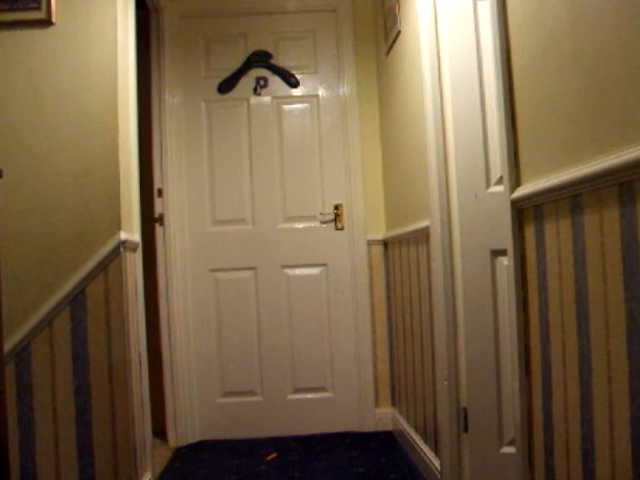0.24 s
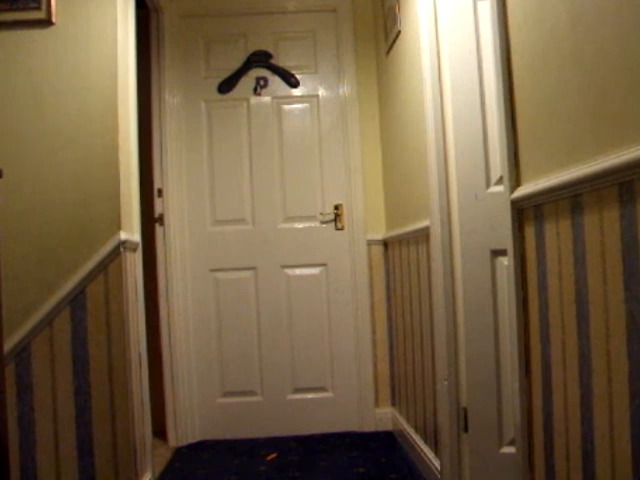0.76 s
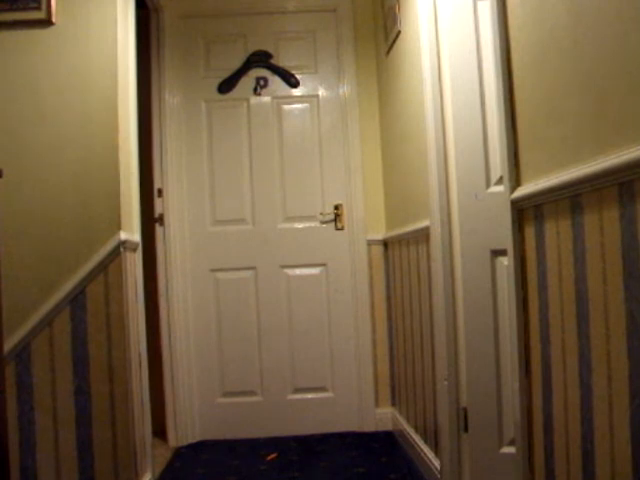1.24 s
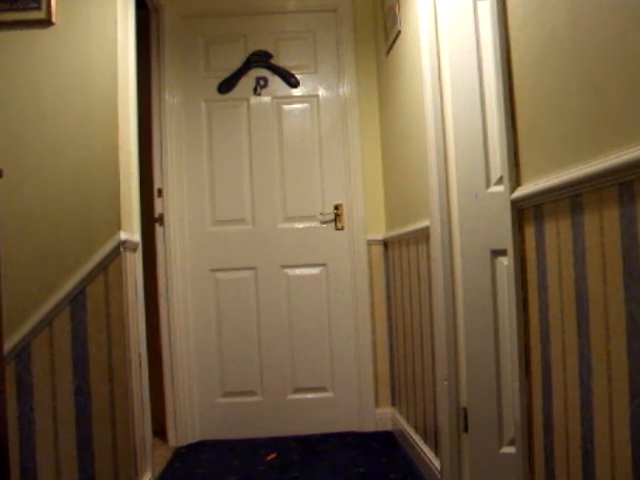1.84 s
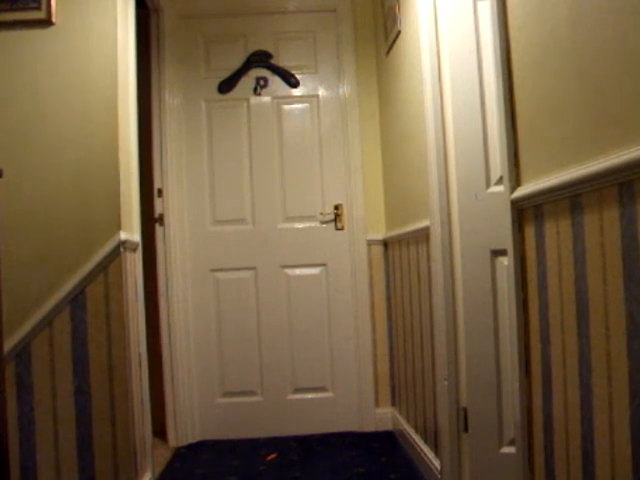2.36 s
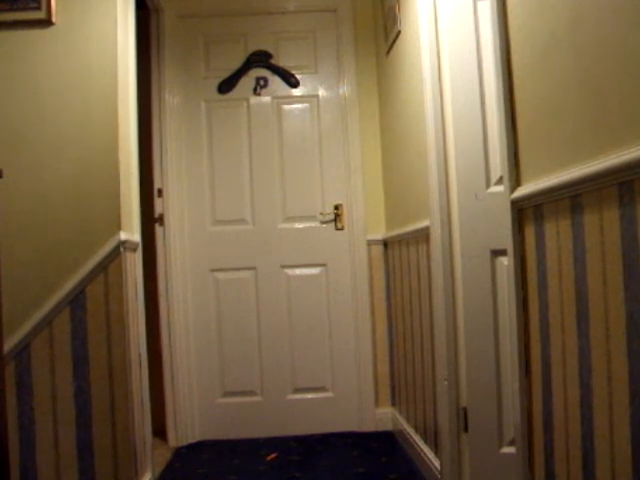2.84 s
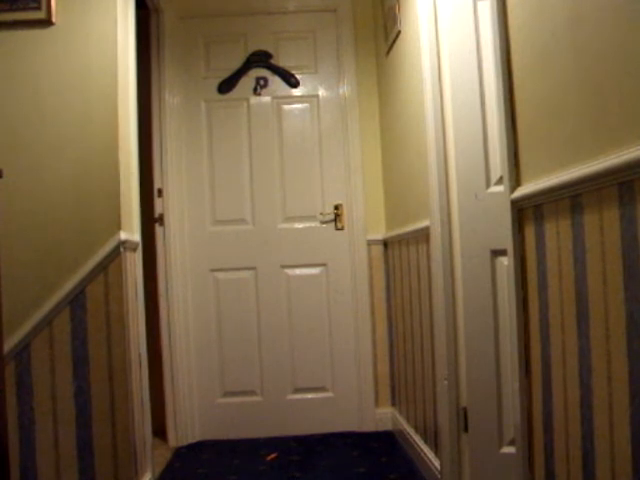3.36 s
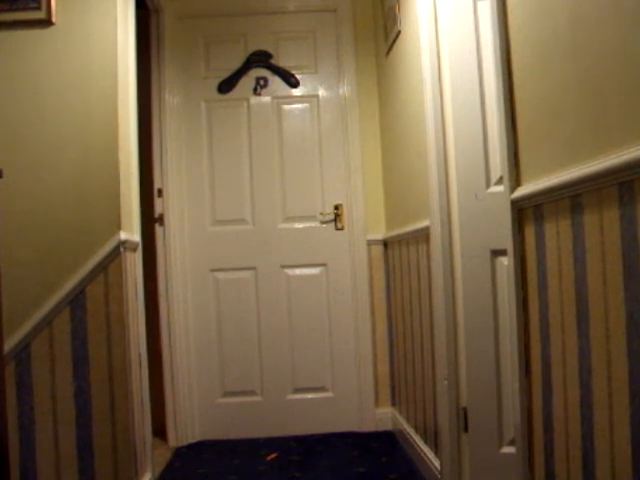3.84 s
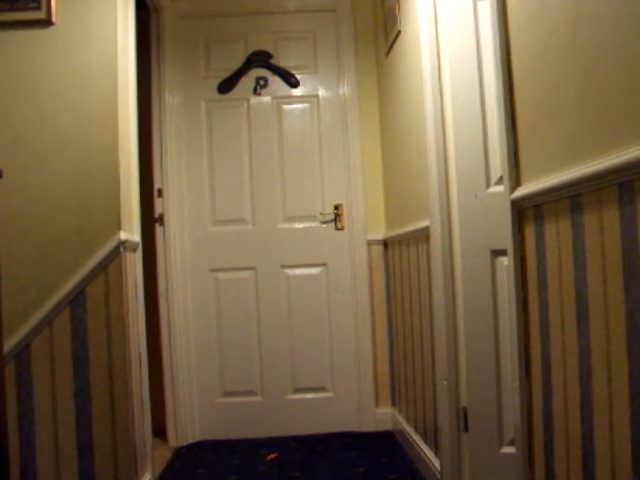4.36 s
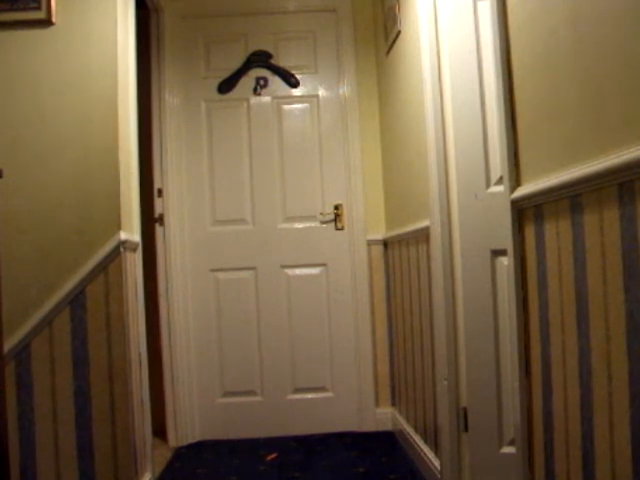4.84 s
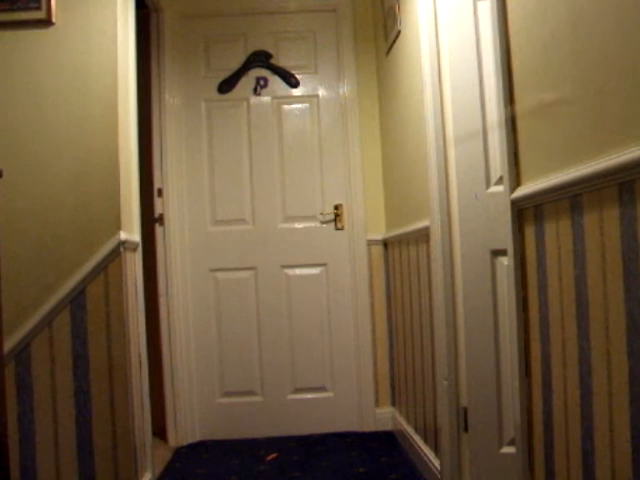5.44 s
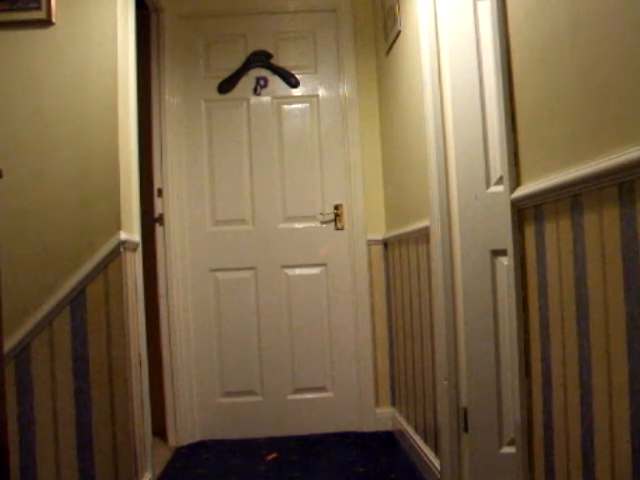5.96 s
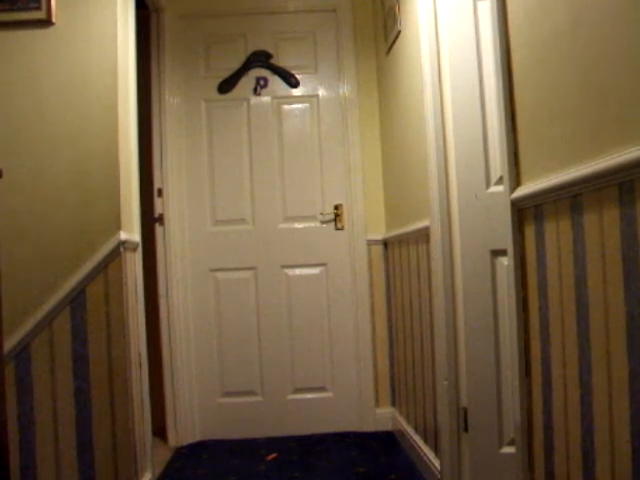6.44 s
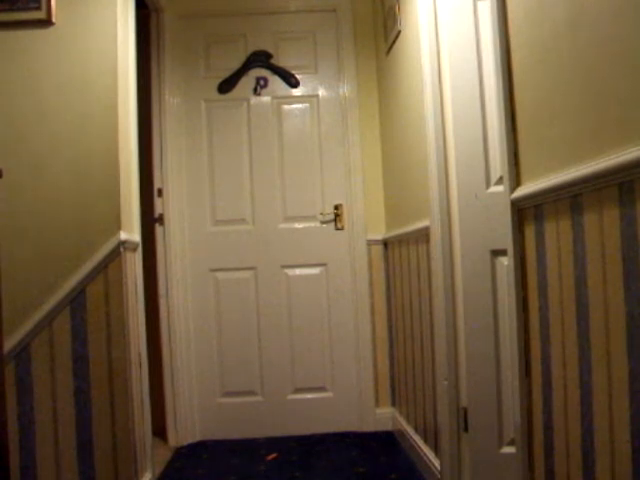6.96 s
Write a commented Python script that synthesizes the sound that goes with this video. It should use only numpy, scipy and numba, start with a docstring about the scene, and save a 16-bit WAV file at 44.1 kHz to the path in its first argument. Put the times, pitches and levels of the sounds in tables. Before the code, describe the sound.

In a narrow hallway, a toy foam-dart blaster fires close to the microphone with a plastic snap and a pop of air, and the dart knocks on a wooden door farther off. The slide is pumped twice with short rasps and clacks. A louder second shot hits the door, then one more pump leads to a third shot. Faint handling knocks and a steady hiss lie underneath.

```python
"""A spring-powered foam-dart blaster is fired close by in a narrow hallway, over a steady hiss.
Loose parts knock in the hand; then a catch clicks, the plunger slams home with a pop of air, and
the dart sets a far wooden door ringing. The slide is pumped twice, rasping by stick-slip friction
and clacking on its stops. A second shot hits the door; one more pump and a third shot follow.
Throughout, gain control ducks on each bang and lets the reverberation swell back."""
import sys
import numpy as np
from scipy import signal
from scipy.fft import rfft, irfft
from scipy.io import wavfile
from numba import njit

SR = 44100
rng = np.random.default_rng(int(sys.argv[2]) if len(sys.argv) > 2 else 0)


def persist_wave(psi):
    """Save psi, clipped to +-1, as 16-bit WAV."""
    counts = np.round(np.clip(psi, -1, 1) * 32767).astype(np.int16)
    wavfile.write(sys.argv[1], SR, np.atleast_2d(counts).T)


N = 317079
TIME = np.arange(N) / SR
BAND_HZ = 7800  # upper edge of the sound
BRIGHT_RASP_DB_PER_OCTAVE, DULL_RASP_DB_PER_OCTAVE = -2.1, -4.5

# The plunger reaches the end of its tube: time_s, slam_db, pop_db, pop_pitch_hz, thump_db
FIRINGS = [(1.339, 9.5, 8, 395, -15), (5.4919, 18, 19.5, 388, 16.5), (7.0646, 21.5, 21, 406, 9)]
# Spectrum of the hand-damped plastic shell, struck hard: frequency_hz, level_db
SHELL_SPECTRUM = [(40, -46), (150, -25.5), (300, -17.5), (450, -5), (600, -1), (900, -6.5), (1200, 2.5),
                  (1500, -3), (1735, 3.5), (2000, -1), (2800, -1), (4500, -2.5), (6300, -2.5), (7600, -2.5)]


def amp(db):
    """Amplitude ratio of a level in decibels."""
    return 10 ** (np.asarray(db) / 20)


def unit(x):
    """Normalisation to unit energy."""
    return x / np.sqrt(np.sum(x ** 2))


def add(track, start_s, x):
    """Superposition: x joins the track at start_s."""
    i = int(start_s * SR)
    track[i:i + len(x)] += x[:max(N - i, 0)]


def through(x, response):
    """Convolution with an impulse response, cut to the length of x."""
    return signal.fftconvolve(x, response)[:len(x)]


def colour(x, spectrum, tilt=0, size=4096):
    """Minimum-phase filter of unit energy; tilt is in dB per octave above 300 Hz."""
    hz, db = np.transpose(spectrum)
    bin_hz = np.maximum(np.arange(size // 2 + 1) * SR / size, 1)
    db = np.interp(np.log(bin_hz), np.log(hz), db) + tilt * np.log2(np.maximum(bin_hz, 300))
    db -= np.clip((bin_hz - BAND_HZ) / 30, 0, 60)
    # folding the cepstrum makes the filter causal
    cepstrum = irfft(np.log(amp(db)))
    cepstrum[1:size // 2] *= 2
    cepstrum[size // 2 + 1:] = 0
    response = irfft(np.exp(rfft(cepstrum)))
    return signal.fftconvolve(x, unit(response))


def fade(t60_s, length_s):
    """Damping: an exponential decay of 60 dB in t60_s."""
    return 1000 ** (-TIME[:int(length_s * SR)] / t60_s)


def ring(modes, length_s):
    """Free vibration is a sum of damped modes; neighbours swing in opposite directions."""
    t = TIME[:int(length_s * SR)]
    return sum((-1) ** k * amp(db) * fade(t60_s, length_s) * np.sin(2 * np.pi * hz * t)
               for k, (hz, db, t60_s) in enumerate(modes))


def crack(t60_s, spectrum, tilt=0, rise_s=0.00034):
    """Impact noise: hard parts chatter briefly, and softer contacts rise more slowly."""
    envelope = fade(t60_s, 0.1)
    envelope *= 1 - np.exp(-TIME[:len(envelope)] / rise_s)
    burst = colour(envelope * rng.standard_normal(len(envelope)), spectrum, tilt)
    return unit(burst) * np.sqrt(np.sum(envelope ** 2))


def body(hz, bass_db):
    """Broad resonance of a hollow body around hz: rows of frequency_hz, level_db."""
    return [(40, bass_db - 12), (hz / 2, bass_db), (hz, 0), (2 * hz, -14), (7000, -40)]


def thud(hz, t60_s, bass_db):
    """An impact excites a broad resonance and sounds as a dull knock."""
    return crack(t60_s, body(hz, bass_db), rise_s=0.00024)


def scrape(length_s, spectrum, tilt, swell_db, slips_per_s=1400, scatter_db=4, rub=0.33):
    """Stick-slip friction: random slips roughen a steady rub that changes by swell_db on the way."""
    n = int(length_s * SR)
    slips = (rng.random(n) < slips_per_s / SR) * amp(scatter_db * rng.standard_normal(n))
    roughness = rub + through(slips, fade(0.019, 0.02))
    rasp = roughness * rng.standard_normal(n) * amp(np.linspace(0, swell_db, n))
    return np.sqrt(n) * colour(unit(rasp), spectrum, tilt)


def hiss(level_db=-49.5):
    """Stationary coloured noise lies under the scene."""
    # Spectrum of the hiss: frequency_hz, level_db
    hiss_spectrum = [(25, -11.5), (60, -11), (125, -12), (170, -12), (240, -4.5), (310, -14.5),
                     (400, -10.5), (610, -7.5), (1000, -14), (1700, -13), (3000, -15.5), (5000, -17),
                     (7800, -14.5)]
    return amp(level_db) * colour(rng.standard_normal(N), hiss_spectrum)[:N]


def grip_shifts(per_s=4.1, level_db=-40.5, spread_db=1.5, tilt=-1):
    """Timing jitter: the grip shifts once at random in each time slot, giving rows for handling()."""
    slots = rng.random((int(per_s * N / SR), 2))
    return [((k + when) / per_s, level_db + spread_db * (2 * size - 1), tilt)
            for k, (when, size) in enumerate(slots)]


def handling(shifts, t60_s=0.035, rise_s=0.0015, rebound_s=0.036):
    """Inelastic collision: each loose part knocks, then drops back once, more softly."""
    # The trigger and loose parts knock in the hand: time_s, level_db, tilt_db_per_octave
    knocks = [(0.061, -32.5, 0.5), (0.333, -38, 3), (0.858, -39, -1.5), (1.099, -35, 5.5),
              (1.175, -35, -2.5), (1.272, -20.5, 4), (2.232, -29.5, 0), (2.408, -30, 0), (2.498, -32.5, -2),
              (2.764, -27.5, -3), (3.117, -25, 5), (3.130, -29, 0.5), (3.346, -25.5, 2), (3.787, -29, -0.5),
              (3.869, -27.5, 4), (4.439, -39, 1), (4.598, -38.5, -1.5), (5.086, -40, 3),
              (5.188, -31.5, -0.5), (5.435, -27, 0.5), (6.009, -27, 0)]
    # Spectrum of the shell, struck softly: frequency_hz, level_db
    soft_spectrum = [(60, -25), (250, -17.5), (450, 4.5), (650, 0), (1300, -1.5), (1800, -4.5), (3000, -10),
                     (7800, -27.5)]
    out = np.zeros(N)
    for time_s, db, tilt in list(knocks) + shifts:
        add(out, time_s, amp(db + 1) * crack(t60_s, soft_spectrum, tilt, rise_s))
        add(out, time_s + rebound_s, amp(db - 10) * crack(t60_s, soft_spectrum, 0, rise_s))
    return out


def hallway(early_db=8, early_s=0.01, build_s=0.005):
    """Reverberation: close walls answer almost at once, then each band decays at its own rate."""
    # Diffuse tail of the hallway: frequency_hz, t60_s, level_db
    bands = [(100, 0.26, 19.5), (430, 0.36, 7), (975, 0.33, 5), (2740, 0.34, 4.5), (7500, 0.28, 6.5)]
    hz, t60_s, db = np.transpose(bands)
    t, tail = TIME[:SR], np.zeros(SR)
    noise = rfft(rng.standard_normal(SR))
    band_position = np.interp(np.log(np.arange(len(noise)) + 1), np.log(hz), np.arange(len(hz)))
    for k in range(len(hz)):
        weight = np.maximum(1 - abs(band_position - k), 0)
        tail += amp(db[k]) * fade(t60_s[k], 1) * irfft(noise * weight, SR)
    build_up = (1 - np.exp(-t / build_s)) ** 2
    early_boost = 1 + amp(early_db) * np.exp(-t / early_s)
    return unit(tail * build_up * early_boost)


def end_stop(clack_db, thump_db, thump_hz):
    """Impact of the slide on its stop: the shell clacks and the hollow body resonates."""
    clack = amp(clack_db) * crack(0.021, SHELL_SPECTRUM, tilt=-1.5, rise_s=0.0014)
    return clack + amp(thump_db) * thud(thump_hz, t60_s=0.028, bass_db=-26)


def slide_taps():
    """Mechanical play lets the loose slide tap its stop."""
    # Taps outside the strokes: time_s, clack_db, thump_db, thump_hz
    taps = [(0.376, -29, -28.5, 1400), (2.120, -15, -18.5, 646), (6.661, -36, -34, 1720)]
    out = np.zeros(N)
    for time_s, clack_db, thump_db, thump_hz in taps:
        add(out, time_s, end_stop(clack_db, thump_db, thump_hz))
    return out


def plunger(rush_s=0.012, slam_lag_s=0.000988):
    """Elastic energy is released: the catch slips, the plunger rushes down its tube and slams home."""
    # The trigger catch lets go: time_s, level_db, tilt_db_per_octave, t60_s
    catches = [(1.3303, 2, -2, 0.051), (5.4815, -3.5, 4.5, 0.022), (7.0548, -1, 2, 0.019)]
    out = np.zeros(N)
    for time_s, db, tilt, t60_s in catches:
        add(out, time_s, amp(db) * crack(t60_s, SHELL_SPECTRUM, tilt, rise_s=0.0012))
    for time_s, slam_db, _, _, thump_db in FIRINGS:
        add(out, time_s - rush_s, amp(-25) * scrape(rush_s, SHELL_SPECTRUM, tilt=-7, swell_db=6))
        add(out, time_s + slam_lag_s, amp(slam_db) * crack(0.052, SHELL_SPECTRUM, rise_s=0.00042))
        add(out, time_s, amp(thump_db) * thud(hz=1100, t60_s=0.013, bass_db=-30.5))
    return out


def air_pops(rise_s=0.0013, barrel_db=-9, barrel_t60_s=0.031):
    """Air-column resonance: a pulse of air leaves behind the dart, and the open barrel rings on."""
    out, t = np.zeros(N), TIME[:SR // 10]
    pulse = (t / (2 * rise_s)) ** 2 * np.exp(2 - t / rise_s)
    barrel = amp(barrel_db - 60 * t / barrel_t60_s) * (1 - np.exp(-t / rise_s))
    for time_s, _, pop_db, pitch_hz, _ in FIRINGS:
        add(out, time_s, amp(pop_db) * (pulse + barrel) * np.cos(2 * np.pi * pitch_hz * t))
    return out


def spring(pitch_hz=436):
    """The steel spring rings at a natural frequency: briefly when slack, for long when cocked."""
    # The spring is set ringing: start_s, level_db, t60_s
    excitations = [(1.34, -16, 0.39), (5.495, -7, 0.4), (6.355, -33, 1.62), (7.066, -15, .35)]
    out = np.zeros(N)
    for start_s, db, t60_s in excitations:
        add(out, start_s, ring([(pitch_hz, db, t60_s)], length_s=2))
    return out


def darts():
    """Modal excitation: where a rubber tip slaps the door decides which panel modes answer."""
    # Darts land and the door shudders: time_s, level_db, slap_db, centre_hz, half_width_octaves
    impacts = [(1.592, -20.5, -9, 380, 0.48), (1.614, -11.5, -43, 703, 0.052),
               (1.944, -39.5, -86, 181, 0.71), (5.702, -3.5, -6, 910, 0.71),
               (5.720, -2.5, -38.5, 760, 0.083), (5.871, -22, -26, 561, 0.12)]
    # Modes of the wooden door panels: frequency_hz, level_db, t60_s
    door_modes = [(85, 0, .18), (170, 0, .18), (242, 2, .2), (330, -2, .14), (479, -5, .17), (517, -6, .15),
                  (630, 1, .18), (684, -1, .17), (781, -1, .18), (840, -2, .22), (930, -5, .13),
                  (1150, -8, .15)]
    panels, slaps = np.zeros(N), np.zeros(N)
    for time_s, db, slap_db, centre_hz, half_width in impacts:
        excited = []
        for hz, mode_db, t60_s in door_modes:
            detuning = abs(np.log2(hz / centre_hz)) / half_width
            excited.append((hz, mode_db - 12 * np.log1p(detuning), t60_s))
        add(panels, time_s, amp(db) * ring(excited, length_s=1))
        add(slaps, time_s, amp(slap_db) * crack(0.029, SHELL_SPECTRUM))
        add(slaps, time_s, amp(db - 8) * thud(centre_hz, t60_s=0.12, bass_db=-15))
    return panels, slaps


def slide_pulls(slack_s=0.019, swell_db=-5):
    """Friction noise falls with speed: the slide breaks free and rasps as the spring slows it."""
    # Backward strokes: start_s, stop_s, slack_db, rasp_db, clack_db, thump_db, thump_hz
    strokes = [(2.556, 2.673, -22.5, -24.5, -1, -9, 1050), (3.621, 3.641, -18, -30.5, -27, -19.5, 620),
               (6.07, 6.155, -23.5, -20, 5.5, -12.5, 296)]
    out = np.zeros(N)
    for start_s, stop_s, slack_db, rasp_db, clack_db, thump_db, thump_hz in strokes:
        slack_click = crack(0.027, SHELL_SPECTRUM, tilt=-2, rise_s=0.0015)
        slack_rub = scrape(slack_s, SHELL_SPECTRUM, DULL_RASP_DB_PER_OCTAVE, swell_db=0)
        breakaway = crack(0.022, SHELL_SPECTRUM, rise_s=0.00062)
        rasp = scrape(stop_s - start_s, SHELL_SPECTRUM, BRIGHT_RASP_DB_PER_OCTAVE, swell_db)
        add(out, start_s - slack_s, amp(slack_db) * slack_click)
        add(out, start_s - slack_s, amp(slack_db - 11) * slack_rub)
        add(out, start_s, amp(-9.5) * breakaway)
        add(out, start_s, amp(rasp_db) * rasp)
        add(out, stop_s, end_stop(clack_db, thump_db, thump_hz))
    return out


def latches():
    """Brief contacts have broad spectra: the latch and ratchet snap brightly."""
    # Snaps during pumping: time_s, level_db
    snaps = [(2.5863, -1.5), (2.6313, 9), (2.876, -3), (3.9677, 7), (6.0915, -3), (6.129, 9), (6.328, -1)]
    out = np.zeros(N)
    for time_s, db in snaps:
        add(out, time_s, amp(db) * crack(0.01, SHELL_SPECTRUM, tilt=0.5))
    return out


def slide_pushes(creep_s=0.016, swell_db=8.5, boom_hz=570):
    """Friction noise grows with speed: the slide creeps, then rasps and booms ever louder to its stop."""
    # Return strokes: start_s, stop_s, rasp_db, boom_db, clack_db, thump_db, thump_hz
    strokes = [(2.843, 2.919, -21, -29.5, -5, -19, 257), (3.915, 3.940, -23, -19, 0.5, -18, 575),
               (6.267, 6.35, -18, -29, 6, -21.5, 298)]
    out = np.zeros(N)
    for start_s, stop_s, rasp_db, boom_db, clack_db, thump_db, thump_hz in strokes:
        creep = scrape(creep_s, SHELL_SPECTRUM, DULL_RASP_DB_PER_OCTAVE, swell_db)
        breakaway = crack(0.035, SHELL_SPECTRUM, rise_s=0.0023)
        rasp = scrape(stop_s - start_s, SHELL_SPECTRUM, DULL_RASP_DB_PER_OCTAVE, swell_db)
        boom = scrape(stop_s - start_s, body(boom_hz, bass_db=-30), 0, swell_db)
        add(out, start_s - creep_s, amp(rasp_db - 14) * creep)
        add(out, start_s, amp(-13) * breakaway)
        add(out, start_s, amp(rasp_db) * rasp + amp(boom_db) * boom)
        add(out, stop_s, end_stop(clack_db, thump_db, thump_hz))
    return out


def scene():
    """Direct sound and reflections superpose: the blaster is close and the door is far."""
    shifts, reflections = grip_shifts(), np.zeros(N)
    # shell and door radiate different clatter to each of three walls; the last is also heard directly
    for _ in range(3):
        shell = plunger() + slide_pulls() + slide_pushes() + slide_taps() + handling(shifts)
        snaps = latches()
        panels, slaps = darts()
        reflections += through(amp(-5) * shell + amp(-8) * snaps + amp(-4) * slaps, hallway())
    air = air_pops()
    reflections += through(amp(-12) * air + amp(-8) * panels, hallway())
    direct = shell + snaps + air + spring() + panels + slaps
    return (direct + reflections + hiss())[None]


@njit
def follow(x, attack, release):
    """Envelope detection: the rectified signal is smoothed at one rate rising and another falling."""
    out, level = np.empty(len(x)), 0.
    for i in range(len(x)):
        rate = attack if abs(x[i]) > level else release
        level += (abs(x[i]) - level) * rate
        out[i] = level
    return out


def record(dry, limit_db=-12, attack_s=0.0023, release_s=0.062, dc_offset=-0.0033, top_hz=16000):
    """Automatic gain control ducks after each bang; the first peaks clip and the band is limited."""
    envelope = follow(dry[0], 1 / (attack_s * SR), 1 / (release_s * SR))
    ducked = dry / np.maximum(envelope / amp(limit_db), 1)
    band_lowpass = signal.ellip(10, 0.2, 70, BAND_HZ, fs=SR, output="sos")
    top_lowpass = signal.ellip(8, 0.2, 70, top_hz, fs=SR, output="sos")
    narrow = signal.sosfilt(band_lowpass, np.clip(ducked + dc_offset, -1, 1))
    return signal.sosfilt(top_lowpass, np.clip(narrow, -1, 1))


dry = scene()
out = record(dry)
persist_wave(out)
```